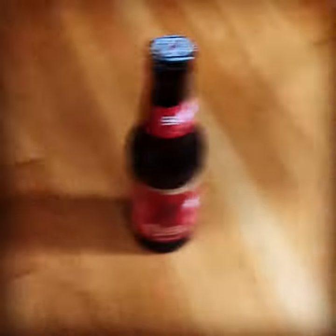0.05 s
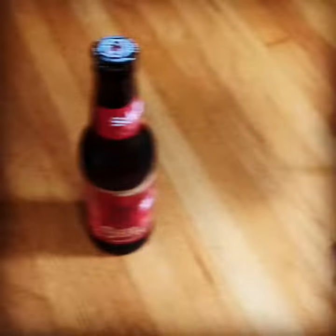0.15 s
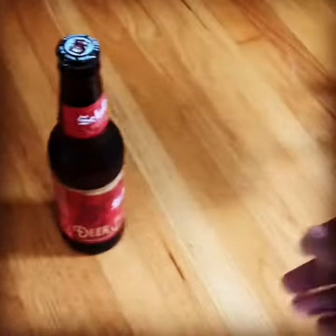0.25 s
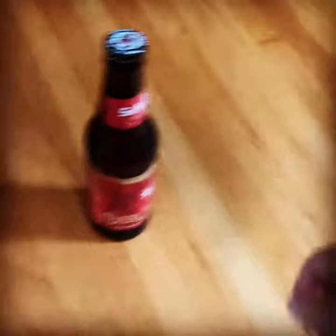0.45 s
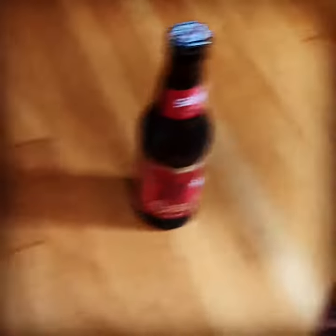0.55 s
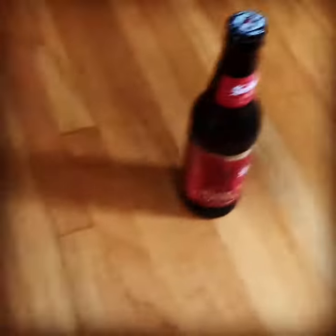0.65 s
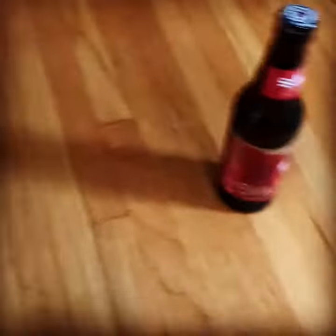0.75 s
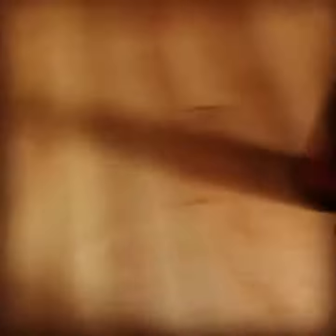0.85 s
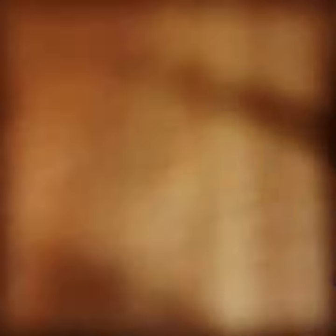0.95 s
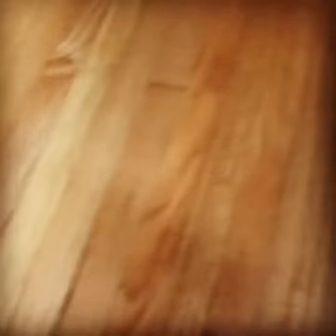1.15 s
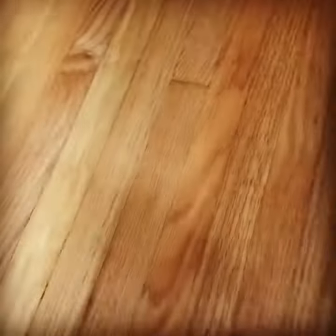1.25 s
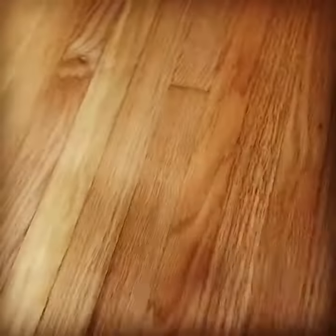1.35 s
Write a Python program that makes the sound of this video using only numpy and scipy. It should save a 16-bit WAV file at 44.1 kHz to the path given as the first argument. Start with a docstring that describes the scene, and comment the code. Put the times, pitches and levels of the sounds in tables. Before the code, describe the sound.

A glass bottle falls on floorboards with two knocks, a bright clink and a short rattle.

```python
"""A glass beer bottle knocked over on a wooden floor, heard in mono from across a bare, live room.
Its heel skids and knocks twice on the boards; it lands on its side with a bright clink and chatters
to rest, each contact ringing both wood and glass. Someone moves: cloth rubs in faint swishes, and a soft
low thump follows. Under it all lie room rumble and an appliance hum. The microphone sheds deep bass,
and a gain control ducks the loudest knocks."""
import sys
import numpy as np
from scipy import signal
from scipy.fft import rfft, irfft, next_fast_len
from scipy.io import wavfile

SR = 44100
rng = np.random.default_rng(int(sys.argv[2]) if len(sys.argv) > 2 else 0)


def unload_audio(sound):
    """Save the sound as a 16-bit wav file, at the path given as the first command line argument."""
    columns = np.transpose(np.atleast_2d(sound))
    # keep every value between -1 and 1, then stretch to whole-number steps
    steps = np.round(np.clip(columns, -1, 1) * 32767)
    wavfile.write(sys.argv[1], SR, steps.astype(np.int16))


N = 61739
T = np.arange(N) / SR

# appliance hum: f/Hz, rms level/dB
HUM_TONES = [(70, -62), (237, -66.5)]
# colour of the room rumble: f/Hz, level/dB
RUMBLE_SPECTRUM = [(25, -17.5), (55, -3.5), (90, -3), (140, -23.5), (260, -18), (500, -31.5), (1200, -36.5),
                   (4000, -44), (15000, -44.5)]
# glass meets wood: t/s, thud level/dB, knock level/dB, lower and upper knock f/Hz, knock t60/s,
# crack level/dB, ring level/dB, place struck (0 heel, 1 side)
CONTACTS = [(0.2220, -4.5, 1, 920, 1552, 0.016, -18, -25, 0),
            (0.2831, -12, 4.5, 740, 1195, 0.012, -11.5, -21.5, 0.36),
            (0.4096, -24.5, 0.5, 934, 1600, .014, -7.5, -3, 1),
            (0.4323, -11, 7, 1170, 1850, 0.0034, -29, -25.5, 0.99),
            (0.447, -14, 2, 960, 1603, 0.01, -10, -14.5, 1),
            (0.4588, -19.5, -4, 1093, 1970, 0.011, -28, -25.5, 0.95),
            (0.4720, -19, -7.5, 862, 1444, 0.006, -38.5, -48.5, 0.77),
            (0.4810, -20, -14.5, 988, 1574, 0.0091, -40.5, -42, 0.16),
            (0.4949, -25, -3, 876, 1426, 0.016, -29.5, -58, 0.79),
            (0.5169, -21.5, -8.5, 760, 1390, 0.0069, -40, -46, 0.31),
            (0.5303, -29, -14, 1340, 2170, 0.0039, -57, -60, 0.43)]
# floorboard modes: f/Hz, level/dB relative to the thud, t60/s
BOARD_MODES = [(69.2, -29, 0.63), (217.9, -19.5, 0.48), (281.2, -24.5, 0.44), (393.3, -25.5, 0.26),
               (625, -36, 0.28)]
# colour of a contact's crack: f/Hz, level/dB
CRACK_SPECTRUM = [(1000, -3.5), (2300, 1), (3100, -5.5), (4400, -8), (5800, 0.5), (7200, -11.5),
                  (8800, -14), (10300, -11.5), (12500, -12.5), (16000, -22)]
# the bottle's modes, a list each: f/Hz, level/dB struck on the heel, level/dB struck on the side, t60/s
GLASS_HZ = [1985, 2610, 4268, 5155, 5548, 7070, 8203, 9020, 10692, 11178, 13412, 15165, 15450]
GLASS_HEEL_DB = [-26, -11, -19, -1, -8, -23, -8, -8, -20, -13, -9, -27, -21]
GLASS_SIDE_DB = [-24, -23, -26, -21, -1, -37, 1, -29, -13, -17, -26, -33, -26]
GLASS_T60_S = [.48, .47, .28, .3, .2, .3, .19, .24, .17, .15, .25, .2, .2]
# reverberation at the microphone: f/Hz, level/dB relative to the direct sound, t60/s
REVERB_BANDS = [(60, 2, .6), (146, 5.5, 0.28), (280, 6, 0.41), (550, -2, 0.48), (990, -1.5, 0.35),
                (1600, -6.5, 0.4), (2600, 3.5, 0.42), (4300, -7, 0.41), (6000, -4, 0.36),
                (8500, -2.5, 0.33), (15000, -10, .3)]
# movements of cloth: peak t/s, level/dB, rise/s, fall/s
SWISHES = [(0.761, -50.5, 0.042, 0.029), (0.847, -46.5, 0.064, .056), (1.14, -51, .036, 0.046),
           (1.39, -60.5, .04, 0.062)]
# colour of rubbing cloth: f/Hz, level/dB
CLOTH_SPECTRUM = [(59, -38.5), (100, -1), (352, 0), (513, -11), (764, -4), (942, -7), (1020, -4),
                  (1560, -4), (2090, -5.5), (2920, -8.5), (3840, -10), (7670, -19), (15000, -28.5)]
# colour of the rumble in the thump: f/Hz, level/dB
THUMP_SPECTRUM = [(30, -4), (60, 1), (100, 3.5), (160, -13.5), (400, -32.5), (2000, -66)]


def from_db(db):
    """Decibels to gain."""
    return 10 ** (np.asarray(db) / 20)


def rms_one(x):
    """Scale to rms 1."""
    return x / np.sqrt(np.mean(x ** 2) + 1e-20)


def peak_one(x):
    """Scale to peak 1."""
    return x / np.max(np.abs(x))


def filtered(x, hz, kind, order=2):
    """Butterworth filter."""
    return signal.sosfilt(signal.butter(order, hz, kind, fs=SR, output="sos"), x + 1e-18)


def at_hz(points, hz):
    """Read (f/Hz, value) points on a log-frequency axis."""
    points = np.array(points)
    return np.interp(np.log(hz + 1e-9), np.log(points[:, 0]), points[:, 1])


def noise(spectrum):
    """Noise of a given colour, rms 1."""
    size = next_fast_len(N)
    gain = from_db(at_hz(spectrum, np.fft.rfftfreq(size, 1 / SR)))
    return rms_one(irfft(rfft(rng.standard_normal(size)) * gain, size)[:N])


def decay(t60):
    """Exponential decay from 1, down 60 dB in t60 seconds."""
    return from_db(np.maximum(-60 * T / t60, -300))


def ring(hz, t60):
    """A struck mode: a dying sine."""
    return np.sin(2 * np.pi * hz * T) * decay(t60)


def delayed(x, s):
    """Start x at s seconds."""
    return np.concatenate([np.zeros(max(int(s * SR), 0)), x])[:N]


def room_tone():
    """The room at rest: low rumble and a faint appliance hum."""
    hum = sum(np.sqrt(2) * from_db(db) * np.sin(2 * np.pi * (hz * T + rng.random()))
              for hz, db in HUM_TONES)
    return hum + from_db(-57.5) * noise(RUMBLE_SPECTRUM)


def tipping(nudge_s=0.199, growth_s=0.0036):
    """A light touch tips the bottle, and its heel skids briefly into the first knock."""
    nudge = delayed(from_db(-43) * ring(hz=1300, t60=0.008), nudge_s)
    until_knock_s = CONTACTS[0][0] - T
    swell = np.exp(-np.abs(until_knock_s) / growth_s) * (until_knock_s > 0)
    skid = rms_one(filtered(rng.standard_normal(N), hz=[503, 1508], kind="band"))
    return nudge + from_db(-34) * skid * swell


def floor_knocks(dull_above_ratio=1.58):
    """Each contact gives a short two-toned woody knock and a thud that sets the boards ringing."""
    blow = signal.unit_impulse(N)
    impact = peak_one(filtered(blow, hz=[190, 750], kind="band"))
    joists = peak_one(filtered(blow, hz=[59.2, 150], kind="band"))   # they give with a low boom
    boards = sum(from_db(db) * ring(hz, t60) for hz, db, t60 in BOARD_MODES)
    thud = impact + from_db(-18) * joists + boards
    out = 0
    for s, thud_db, knock_db, lower_hz, upper_hz, t60, *_ in CONTACTS:
        tones = ring(lower_hz, t60) - ring(upper_hz, t60)
        knock = peak_one(filtered(tones, dull_above_ratio * upper_hz, "low", order=3))
        out = out + delayed(from_db(thud_db) * thud + from_db(knock_db) * knock, s)
    return out


def contact_cracks(echo_s=0.0059, echo_db=9):
    """The hard, bright snap of each contact, thrown back at the microphone by a near surface."""
    snaps = sum(delayed(from_db(crack_db) * noise(CRACK_SPECTRUM) * decay(t60=0.022), s)
                for s, *_, crack_db, _, _ in CONTACTS)
    echo = filtered(snaps, hz=[3700, 4900], kind="band", order=3)
    return snaps + from_db(echo_db) * delayed(echo, echo_s)


def bottle_ring(rise_s=0.0003, twin_ratio=1.0045, twin_db=-18):
    """Each contact tops up the glass modes; where the bottle is struck decides which speak."""
    out = 0
    for hz, heel_db, side_db, t60 in zip(GLASS_HZ, GLASS_HEEL_DB, GLASS_SIDE_DB, GLASS_T60_S):
        envelope = decay(t60) * (1 - np.exp(-T / rise_s))
        energy = 0
        for s, *_, ring_db, place in CONTACTS:
            strike_db = ring_db + np.interp(place, [0, 1], [heel_db, side_db])
            energy = energy + delayed(from_db(strike_db) * envelope, s) ** 2
        cycles = np.outer([1, twin_ratio], hz * T) + rng.random((2, 1))
        main, twin = np.sin(2 * np.pi * cycles)   # the slightly sharper twin makes the mode beat
        out = out + np.sqrt(energy) * (main + from_db(twin_db) * twin)
    return out


def room_reverb(x, delay_s=0.003, build_s=0.008):
    """The bare room answers with a diffuse tail that builds quickly and dies band by band."""
    bands = np.array(REVERB_BANDS)
    edges_hz = np.geomspace(40, 18000, 19)
    response = 0
    for low, high in zip(edges_hz, edges_hz[1:]):
        hz = np.sqrt(low * high)
        t60 = at_hz(bands[:, [0, 2]], hz)
        reflections = filtered(rng.standard_normal(N), [low, high], "band", order=3)[::-1]
        tail = rms_one(reflections * decay(t60) * (1 - np.exp(-T / build_s)))
        band_share = np.sqrt(2 * (high - low) / SR / N)   # gives the band the direct sound's energy
        response = response + from_db(at_hz(bands, hz)) * tail * band_share
    return signal.fftconvolve(x, delayed(response, delay_s))[:N]


def clothing(stir_db=-63, stir_full_s=0.82, fastest_hz=2200, hz_per_db=70, roughness_db=1):
    """Grainy rubbing of cloth swells with each movement; its resonance rises with speed."""
    motion = from_db(stir_db) * np.clip(2 * T / stir_full_s - 1, 0, 1)   # stirring between swishes
    for s, db, rise, fall in SWISHES:
        width_s = np.where(T < s, rise, fall)
        motion = np.hypot(motion, from_db(db) * np.exp(-((T - s) / width_s) ** 2 / 2))
    speed_db = 20 * np.log10(np.maximum(peak_one(motion), 0.1))
    resonance_hz = fastest_hz + hz_per_db * speed_db
    flutter = filtered(rng.standard_normal(N), hz=73, kind="low")   # widens the tone to a narrow band
    rub = rms_one(flutter * np.sin(2 * np.pi * np.cumsum(resonance_hz) / SR))
    grain = rms_one(filtered(rng.standard_normal(N), hz=150, kind="low"))
    return motion * from_db(roughness_db * grain) * (noise(CLOTH_SPECTRUM) + from_db(-10.5) * rub)


def soft_thump(start_s=1.332, rise_s=0.0044, t60=1):
    """A soft bump, like a step on the boards: a small tick and a low, rumbling boom."""
    rumble = from_db(-12) * noise(THUMP_SPECTRUM) * decay(t60)
    boom = (rumble - ring(hz=63.3, t60=t60)) * (1 - np.exp(-T / rise_s))
    tick = ring(hz=958, t60=0.0072)
    return delayed(from_db(-40) * tick + from_db(-29.5) * boom, start_s)


def scene():
    """At the microphone: the bottle, direct and off the walls, and the quiet sounds around it."""
    blows = tipping() + floor_knocks() + contact_cracks()
    glass = bottle_ring()
    # the glass ring is kept drier than the knocks, so its tones sound clear and steady
    reverb = room_reverb(blows + from_db(-8.5) * glass)
    return (blows + glass + reverb + clothing() + soft_thump() + room_tone())[None]


def record(dry, threshold_db=-31, duck_db_per_db=0.4, smoothing_s=0.045, makeup_db=1, ceiling=0.93):
    """The microphone sheds deep bass, gain control ducks loud parts, peaks round off, the top is cut."""
    mic = filtered(dry, hz=42, kind="high")
    pole = np.exp(-1 / (smoothing_s * SR))
    power = signal.lfilter([(1 - pole) ** 2], [1, -2 * pole, pole * pole], mic ** 2)
    over_db = np.maximum(10 * np.log10(power + 1e-12) - threshold_db, 0)
    ducked = mic * from_db(makeup_db - duck_db_per_db * over_db)
    overloaded = ceiling * np.tanh(ducked / ceiling)
    top_cut = signal.ellip(10, 0.1, 90, 16000, fs=SR, output="sos")   # steep above 16 kHz
    return signal.sosfilt(top_cut, overloaded)


dry = scene()
out = record(dry)
unload_audio(out)
```